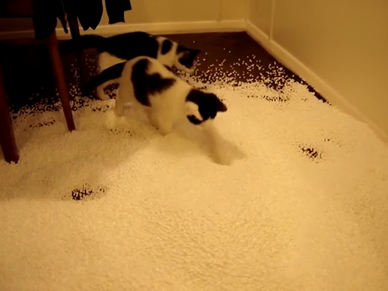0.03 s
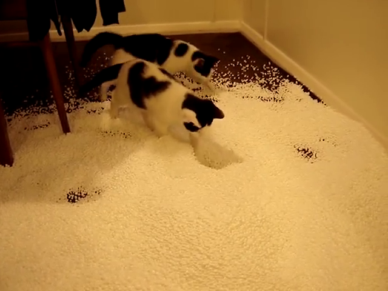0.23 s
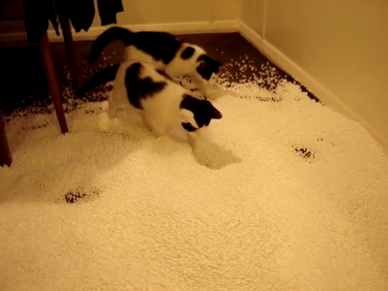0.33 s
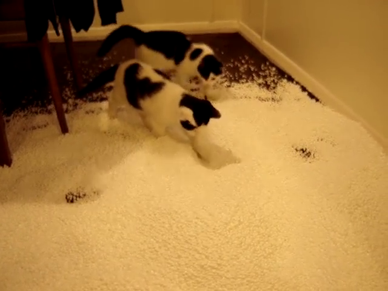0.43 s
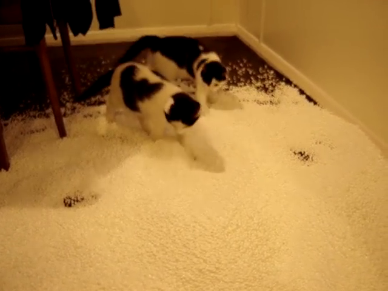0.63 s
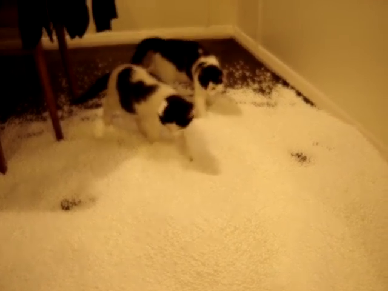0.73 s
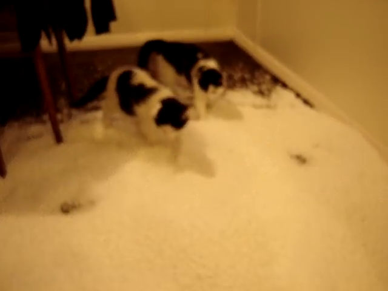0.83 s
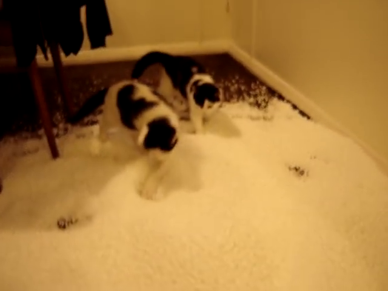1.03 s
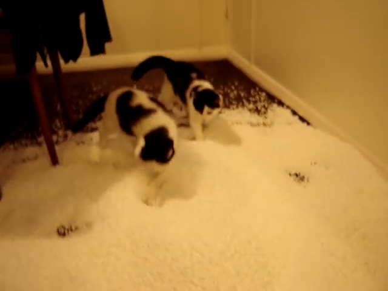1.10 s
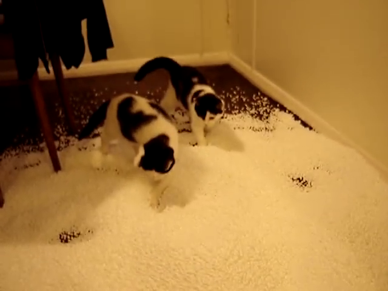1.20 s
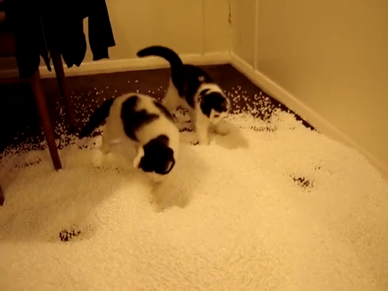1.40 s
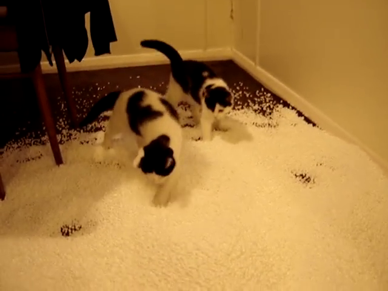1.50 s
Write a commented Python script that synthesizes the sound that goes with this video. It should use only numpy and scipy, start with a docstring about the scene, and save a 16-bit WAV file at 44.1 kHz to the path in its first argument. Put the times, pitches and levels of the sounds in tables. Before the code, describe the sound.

Cats push their paws through foam beads on a floor, making brief, soft swishes over a low rustle. Two close, plastic-like ticks each follow a stronger swish, the first tick louder. The small room hums faintly.

```python
"""A small, faintly humming room where two cats paw through a drift of foam beads on the floor.
Each push rubs thousands of beads together in a soft swish, over a low rustle of beads that keep shifting.
Twice something small and hard, probably plastic, ticks close by: a crack, a short ring and a rattle."""
import sys
import numpy as np
from scipy import signal
from scipy.fft import rfft, irfft
from scipy.io import wavfile

SR = 44100
rng = np.random.default_rng(int(sys.argv[2]) if len(sys.argv) > 2 else 0)


def wav_record(signal):
    """Record a signal, one row per channel, as 16-bit PCM in the file named by sys.argv[1]."""
    frames = np.transpose(np.atleast_2d(signal))
    bounded = np.clip(frames, -1, 1)
    # unit amplitude maps onto the largest positive 16-bit level
    quanta = np.round(bounded * 32767).astype(np.int16)
    wavfile.write(sys.argv[1], SR, quanta)


N = 68355


def amp(db):
    """Decibels to gain."""
    return 10 ** (np.asarray(db) / 20)


def unit(x):
    """Scales to rms 1."""
    return x / np.sqrt(np.mean(x ** 2) + 1e-20)


def add(mix, start_s, sound):
    """Drops a sound into the mix at its cue."""
    part = mix[max(round(start_s * SR), 0):][:len(sound)]
    part += sound[:len(part)]


def fade(t, t60_s):
    """Exponential decay, 60 dB down at t60_s."""
    return np.exp(-np.log(1000) * t / t60_s)


def colour(x, eq, tilt_db_per_octave=0):
    """Shapes a signal with an EQ curve and a tilt, at rms 1."""
    octave = np.log2(np.fft.rfftfreq(len(x), 1 / SR) + 1)
    freq_hz, gain_db = np.transpose(eq)
    curve_db = np.interp(octave, np.log2(freq_hz), gain_db) + tilt_db_per_octave * (octave - 10)
    return unit(irfft(rfft(x) * amp(curve_db), len(x)))


def narrow_noise(pitch_hz, width_hz):
    """Noise in one resonance, at rms 1: a wavering tone."""
    freq_hz = np.fft.rfftfreq(N, 1 / SR)
    spectrum = rfft(rng.standard_normal(N)) / (1 + ((freq_hz - pitch_hz) / width_hz) ** 2)
    return unit(irfft(spectrum, N))


# EQ of the dull room tone: freq_hz, gain_db
ROOM_TONE_EQ = [(20, -18), (50, -11.5), (85, -1), (150, -2.5), (220, -4), (280, 2), (315, -4.5), (360, -3),
                (395, 0), (460, -1.5), (530, 0), (590, 1), (640, -1.5), (730, 1), (850, -9), (1500, -14.5),
                (10000, -26)]
# Mains hum and two faint steady tones: pitch_hz, level_db
HUM_TONES = [(100.1, -50.5), (219, -63.5), (355, -62.5)]
# Drone of an appliance: pitch_hz, width_hz, level_db
APPLIANCE_DRONE = [(534, 9, -58), (570.7, 9.4, -55.5)]


def background(tone_db=-49.5):
    """The bed: room tone, steady mains hum and an appliance's faint, wavering drone."""
    t = np.arange(N) / SR
    bed = amp(tone_db) * colour(rng.standard_normal(N), ROOM_TONE_EQ)
    for pitch_hz, level_db in HUM_TONES:
        bed += amp(level_db) * np.sqrt(2) * np.sin(2 * np.pi * (pitch_hz * t + rng.random()))
    for pitch_hz, width_hz, level_db in APPLIANCE_DRONE:
        bed += amp(level_db) * narrow_noise(pitch_hz, width_hz)
    return bed


def room_reverb(send, t60_s=0.28, predelay_s=0.005, echoes_per_s=3000):
    """Sparse reflections from near walls, dying quickly."""
    t = np.arange(SR // 2) / SR
    taps = rng.standard_normal(len(t)) * (rng.random(len(t)) < echoes_per_s / SR)
    taps *= (t > predelay_s) * fade(t, t60_s)
    return signal.fftconvolve(send, taps / np.linalg.norm(taps))[:N]


def bead_slips(per_s, spread_db):
    """The grain of the foam: random tiny slips of bead on bead, a few of them larger."""
    size = amp(spread_db * np.minimum(rng.exponential(1, N), 5))
    polarity = np.sign(rng.standard_normal(N))
    return size * polarity * (rng.random(N) < per_s / SR)


# EQ of the shifting beads: freq_hz, gain_db
RUSTLE_EQ = [(100, -15.5), (600, -7.5), (1100, 0), (1900, -1.5), (2600, -3.5), (3400, -3), (4200, -5.5),
             (6500, -7), (7800, -10), (8600, -11), (10000, -17)]
# Fader ride of the shifting beads: time_s, level_db
RUSTLE_RIDE = [(0, -49.5), (.09, -52), (.26, -47.5), (.39, -48.5), (.52, -48.5), (.7, -47), (.88, -48),
               (1.15, -46.5), (1.28, -51), (1.55, -45)]


def shifting_beads():
    """Beads keep shifting under the cats' weight in a low rustle."""
    level = amp(np.interp(np.arange(N) / SR, *np.transpose(RUSTLE_RIDE)))
    return level * colour(bead_slips(per_s=7000, spread_db=2.5), RUSTLE_EQ)


# Modes of the hard object: pitch_hz, rise_s, t60_s, first_tick_gain_db, second_tick_gain_db
OBJECT_MODES = [(972, 0.00083, 0.026, -2.5, -27), (1553, 0.0011, 0.043, -11, -1),
                (1673, .004, 0.027, 4, -14), (1856, 0.0011, 0.038, -7, -2.5),
                (2157, 0.0032, 0.026, 3.5, 1.5), (2468, 0.0016, 0.012, -7, 5.5),
                (2607, 0.0007, 0.044, -9.5, -1.5), (2970, 0.00052, 0.049, -24, -6.5),
                (3227, 0.00083, .019, -4, -4.5), (3398, 0.0022, 0.026, -9, -10),
                (4040, 0.0012, 0.021, -12.5, -18.5), (5500, 0.00058, 0.013, -17.5, -12.5),
                (6370, 0.00063, 0.017, -21.5, -6), (7030, 0.00043, 0.015, -14, -20),
                (9060, 0.00086, 0.015, -25, -15)]


def object_ring(t, tick_index, linger_gain_db=-36.5):
    """The object's modes build up and damp quickly, leaving a faint lingering ring."""
    modes = np.zeros(N)
    for k, (pitch_hz, rise_s, t60_s, *gains_db) in enumerate(OBJECT_MODES):
        envelope = np.minimum(t / rise_s, 1) * fade(np.maximum(t - rise_s, 0), t60_s)
        modes += (-1) ** k * amp(gains_db[tick_index]) * envelope * np.sin(2 * np.pi * pitch_hz * t)
    linger = narrow_noise(pitch_hz=1900, width_hz=160) * fade(t, t60_s=0.61)
    return modes + amp(linger_gain_db) * linger


# EQ of the crack at the contact: freq_hz, gain_db
CRACK_EQ = [(100, -25), (400, 4), (800, 2.5), (1200, 1), (1500, -1), (3400, -6), (3800, -9), (5000, -6),
            (6900, -9.5), (7500, -23), (10000, -21)]
# EQ of the rattle after it: freq_hz, gain_db
RATTLE_EQ = [(100, -27), (700, -23), (1200, -1), (1800, -12), (2500, 3), (3400, -7), (4500, -12.5),
             (10000, -39)]
# Cues for the ticks: start_s, ring_db, crack_db, puff_db, rattle_db
TICK_CUES = [(.2005, -9, -11.5, -28, -28), (1.0556, -18, -24, -58, -21.5)]


def hard_ticks(puff_hz=262, rattle_rise_s=0.0055):
    """Each contact layers a ring, a crack, a small push of air and a short rattle."""
    t = np.arange(N) / SR
    track = np.zeros(N)
    for index, (start_s, ring_db, crack_db, puff_db, rattle_db) in enumerate(TICK_CUES):
        ring = amp(ring_db) * object_ring(t, index)
        crack = amp(crack_db) * colour(rng.choice([-1, 1], N), CRACK_EQ) * fade(t, t60_s=0.026)
        air = np.sin(2 * np.pi * puff_hz * t) + .5 * (1 - np.cos(np.pi * puff_hz * t))
        puff = -amp(puff_db) * air * fade(t, t60_s=0.033)
        rattle = amp(rattle_db) * colour(rng.standard_normal(N), RATTLE_EQ)
        rattle *= np.minimum(t / rattle_rise_s, 1) * fade(t, t60_s=0.059)
        add(track, start_s, ring + crack + puff + rattle)
    return track


# EQ of rubbing beads, before each push's tilt: freq_hz, gain_db
SWISH_EQ = [(60, -12), (250, -2.5), (600, -1), (1200, 2.5), (2200, -0.5), (3400, -0.5), (3900, -1.5),
            (4250, -1.5), (4700, -5.5), (7000, -10), (8500, -15.5), (10000, -20.5)]
# Cues for the paws: start_s, rise_s, hold_s, release_s, level_db, tilt_db_per_octave
PAW_CUES = [(0.091, 0.015, 0.011, 0.051, -34, 2.55), (.525, 0.023, .02, 0.063, -46, 3.5),
            (.64, 0.028, 0.044, 0.081, -50, 3), (0.904, 0.057, 0.016, 0.069, -32, 3),
            (1.085, 0.01, 0.032, .08, -49.5, 4), (1.344, 0.011, 0.008, 0.058, -48.5, 4),
            (1.394, 0.013, 0.014, 0.063, -46, 1), (1.469, 0.059, .03, .06, -41.5, 4.5)]


def paw_pushes(release_power=0.41):
    """Paws shove the beads together: each dense swish swells, holds and dies away."""
    t = np.arange(N) / SR
    track = np.zeros(N)
    for start_s, rise_s, hold_s, release_s, level_db, tilt_db_per_octave in PAW_CUES:
        attack = np.minimum(t / rise_s, 1)
        release = np.clip(1 - (t - rise_s - hold_s) / release_s, 0, 1) ** release_power
        swish = colour(bead_slips(per_s=14000, spread_db=2), SWISH_EQ, tilt_db_per_octave)
        add(track, start_s, amp(level_db) * attack * release * swish)
    return track


def scene(paw_send_db=-20.5, tick_send_db=-35):
    """The mix: paws across the room, ticks close and nearly dry, rustle and hum underneath."""
    paws = paw_pushes()
    ticks = hard_ticks()
    reverb = room_reverb(amp(paw_send_db) * paws + amp(tick_send_db) * ticks)
    return (paws + ticks + reverb + shifting_beads() + background())[None]


def record(dry, ceiling=0.92, cutoff_hz=10080):
    """A small camera's sound: peaks round off near full scale, then a low-pass cuts the top."""
    rounded = dry / (1 + (dry / ceiling) ** 6) ** (1 / 6)
    lowpass = signal.firwin(601, cutoff_hz, window=("kaiser", 8), fs=SR)
    return signal.oaconvolve(rounded, lowpass[None], "same")


dry = scene()
out = record(dry)
wav_record(out)
```